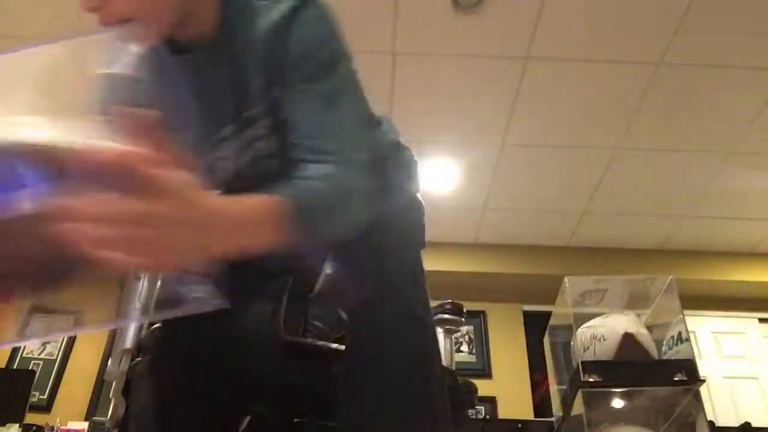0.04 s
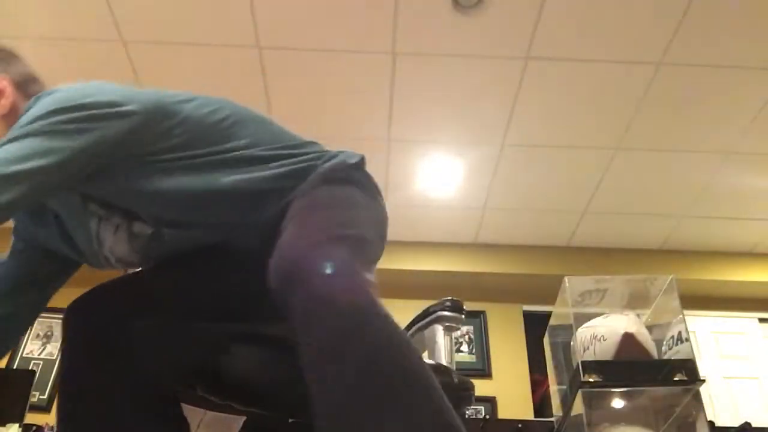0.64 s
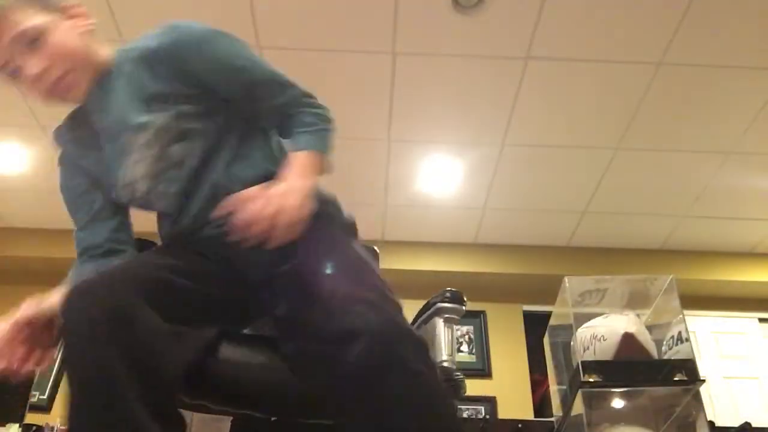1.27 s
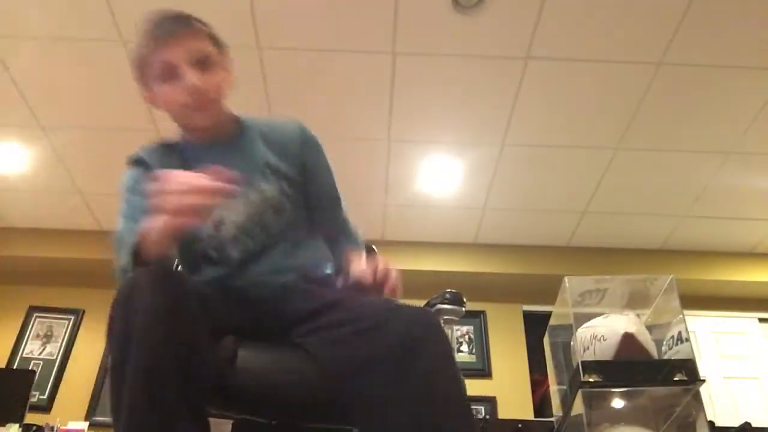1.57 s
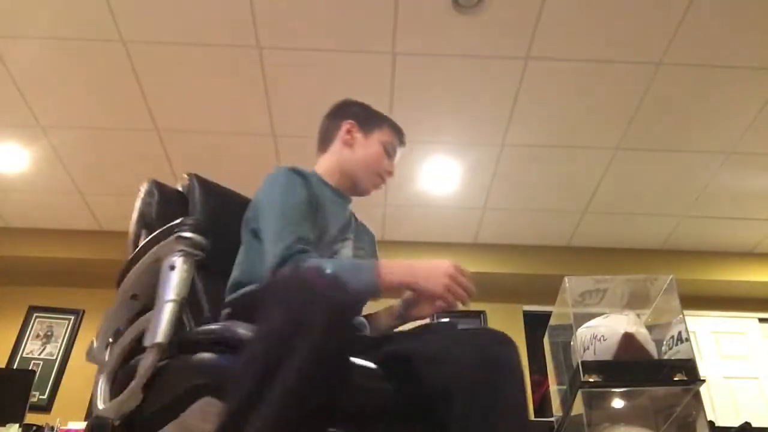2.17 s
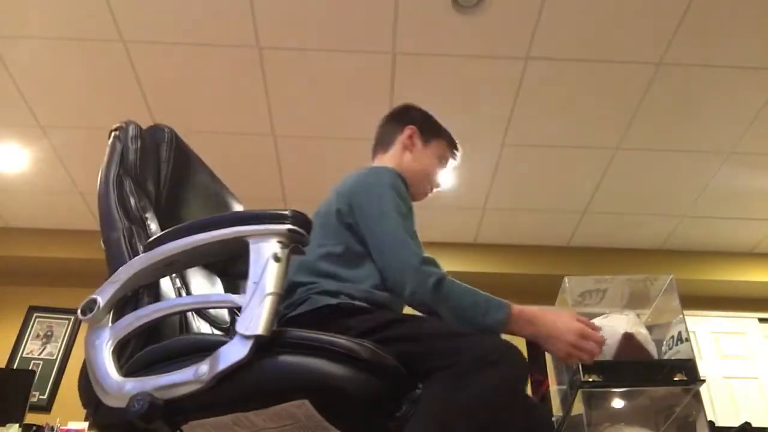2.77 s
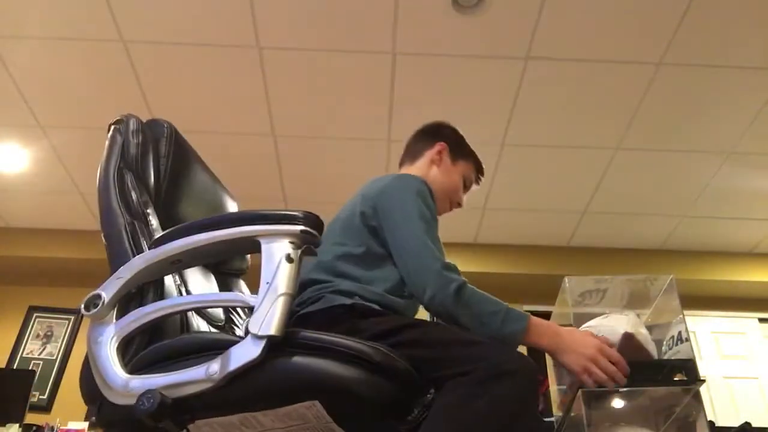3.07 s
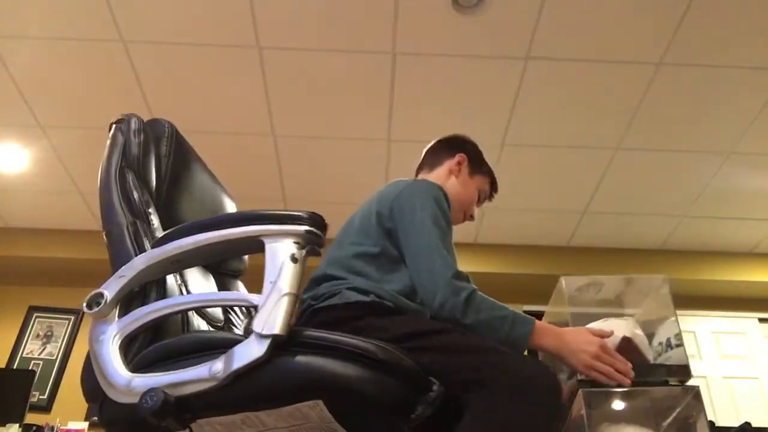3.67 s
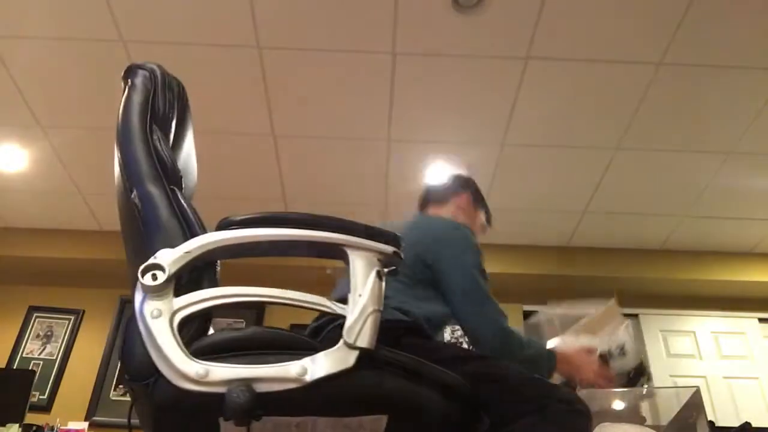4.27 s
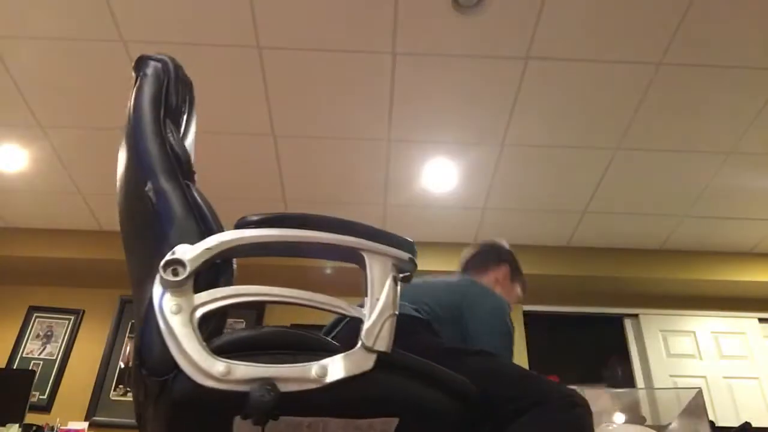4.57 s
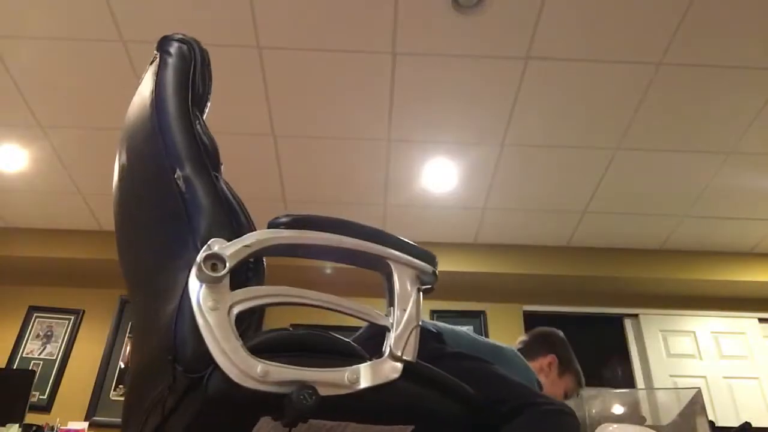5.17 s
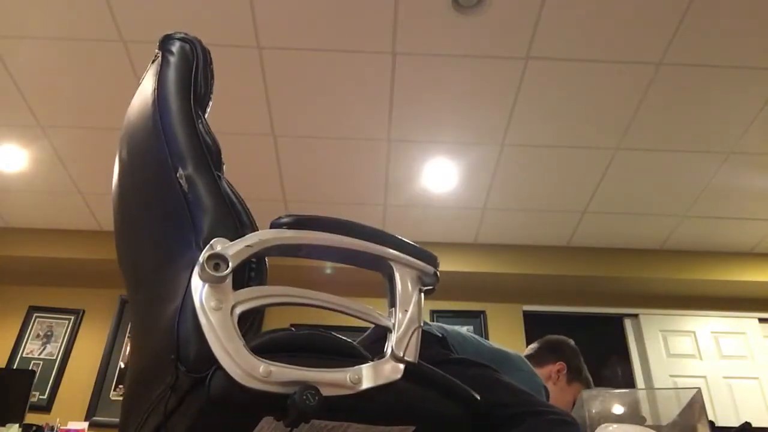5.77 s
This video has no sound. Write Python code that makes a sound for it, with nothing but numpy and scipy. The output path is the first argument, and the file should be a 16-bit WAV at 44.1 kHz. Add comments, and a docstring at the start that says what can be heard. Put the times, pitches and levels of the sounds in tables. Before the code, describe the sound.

A plastic display case clatters down with a squeak, an office chair knocks, clothes rustle, then another case creaks and thumps down.

```python
"""In a quiet room a clear acrylic display case is put down close by; it squeaks by stick-slip friction
and clatters to rest. An office chair then swivels with dull knocks, and clothes swish as they rub.
A second case is gripped, creaks, is lifted with a rattle and lands with a thump that sets the floor
booming. Last, it is nudged a few times. Every contact is a pulse coloured by the resonances of the
thing struck, followed by a short scatter of reflections."""
import sys
import numpy as np
from scipy import signal
from scipy.fft import rfft, irfft
from scipy.io import wavfile
from scipy.ndimage import uniform_filter1d

SR = 44100
rng = np.random.default_rng(int(sys.argv[2]) if len(sys.argv) > 2 else 0)


def put_to_file(sound):
    """Save the sound as 16-bit audio at rate SR, in the file named by the first command-line argument."""
    columns = np.atleast_2d(sound).T  # one column per channel
    safe = np.clip(columns, -1, 1)
    whole_steps = np.round(safe * 32767)
    wavfile.write(sys.argv[1], SR, whole_steps.astype(np.int16))


N = 261513
TAIL = SR * 2 // 5   # samples allowed for a decay

# The first case skidding on its edge. Each row: time in seconds, pitch in Hz, relative level in dB.
EDGE_SQUEAK = [(.590, 5550, -62), (.603, 5680, -44), (.609, 5990, -37), (.620, 5940, -33.5),
               (.626, 5250, -38), (.634, 5210, -39), (.640, 5930, -36), (.650, 5380, -51),
               (.695, 5120, -64)]


def first_case(level_db=-3.0):
    """Impacts excite the case's modes; its panels radiate in all directions, so much is heard by reflection."""
    # Each row: start in seconds, knock gain in dB, knock cutoff in Hz, clack gain in dB.
    hits = [(0.012, 8, 303, -30), (0.068, 7.5, 342, -22), (0.092, 14, 330, -20.5), (0.212, -1, 410, -18),
            (0.24, -2, 700, -14), (0.268, -3, 503, -17), (0.399, 0.5, 766, -8), (0.429, 9, 826, -24),
            (0.435, 6.5, 1010, -3.5), (0.443, 17.5, 470, -13), (0.486, 5, 800, -20), (0.555, 0.5, 706, -28),
            (0.725, 8, 850, -7), (0.742, 13.5, 970, -0.5), (0.755, 15.5, 850, -7),
            (0.768, 13.5, 765, -10.5), (0.798, 15.5, 520, -23), (0.839, 10.5, 600, -13.5),
            (0.884, 6, 680, -17)]
    # Each row: resonance in Hz, bandwidth in Hz, lift in dB.
    modes = [(181, 51, 3), (268, 6.6, 7.5), (443, 26, 10), (670, 27, 7), (780, 16, 2.5), (1035, 22, 8),
             (1244, 33, 9.5), (1906, 31, 7.5), (2800, 160, 3.5)]
    body = knocks(hits, bass_hz=227, bass_follow=-0.14, scatter_db=6, build_s=0.0016)
    panels = clacks(hits, [1000, 2800], [3400, 7800], tick_db=-17, scatter_db=10, build_s=0.0012)
    return from_db(level_db) * resonate(body + panels, modes)


def second_case(level_db=-1.5):
    """Bumps on the stand, then the rattle of the lifted case's loose cover, drive one set of modes."""
    # Each row: start in seconds, knock gain in dB, knock cutoff in Hz, clack gain in dB.
    bumps = [(3.397, 9.5, 310, -40), (3.462, 6, 496, -27.5), (3.515, 8, 500, -11.5),
             (3.537, 21.5, 433, -16), (3.548, 12.5, 373, -41), (3.618, 11, 670, -19), (3.659, 12, 590, -7),
             (3.814, 11, 560, -23), (3.885, 4.5, 300, -40), (4.013, -0.5, 460, -25.5),
             (4.13, -1.5, 241, -32)]
    rattle = [(4.262, 2, 640, -28), (4.272, 7, 467, -26), (4.287, 8, 262, -11), (4.295, 1, 312, -20),
              (4.312, 2.5, 236, -16), (4.329, -12, 404, -18)]
    # Each row: resonance in Hz, bandwidth in Hz, lift in dB.
    modes = [(356, 14, 2.8), (435, 7.8, 1.3), (670, 11, 2.8), (1070, 50, 2.7), (1410, 49, 4),
             (2870, 47, 5.9), (5770, 340, 4.3)]
    clack_hz, tick_hz = [1000, 2600], [3600, 7000]
    body = knocks(bumps, bass_hz=180, bass_follow=0.6, scatter_db=3.5, build_s=0.0013)
    panels = clacks(bumps, clack_hz, tick_hz, tick_db=-18.5, scatter_db=2.5, build_s=0.0014)
    base = knocks(rattle, bass_hz=78, bass_follow=0.15, scatter_db=-7.5, build_s=0.0014)
    cover = clacks(rattle, clack_hz, tick_hz, tick_db=-10, scatter_db=-7.5, build_s=0.0014, t60=0.025)
    return from_db(level_db) * resonate(body + panels + base + cover, modes)


def case_on_floor(level_db=-2.0):
    """Double impact: the case meets the floor with one edge, then drops onto the other."""
    # Each row: start in seconds, knock gain in dB, knock cutoff in Hz, clack gain in dB.
    hits = [(4.494, -2, 426, -48), (4.582, 12, 690, 1), (4.589, 20.5, 700, -3.5), (4.715, -0.5, 335, -47),
            (5.365, -1, 370, -34), (5.415, 8.5, 507, -24.5), (5.478, 8, 470, -31), (5.762, -12, 440, -52),
            (5.808, 9.5, 390, -42)]
    # Each row: resonance in Hz, bandwidth in Hz, lift in dB.
    modes = [(252, 20, 1.9), (321, 25, 3), (419, 23, 4.5), (585, 54, 4.4), (1080, 29, 2.6), (1290, 110, 8),
             (2500, 1300, 3.5)]
    drops = rebounds(hits, delay_s=0.017, gain_db=-1, limit_db=18, top_hz=310)
    first_edge = knocks(hits, bass_hz=124, bass_follow=0.1, scatter_db=3, build_s=0.00058)
    other_edge = knocks(drops, bass_hz=120, bass_follow=0.17, scatter_db=-8, build_s=0.00076)
    panels = clacks(hits, [900, 2800], [2700, 6200], tick_db=-12, scatter_db=5, build_s=0.0005)
    return from_db(level_db) * resonate(first_edge + other_edge + panels, modes)


def knocks(hits, bass_hz, bass_follow, scatter_db, build_s, mid_knock_hz=500):
    """A force pulse is as bright as it is brief; its low edge follows its cutoff by a power law."""
    out, impulse = np.zeros(N), signal.unit_impulse(TAIL // 8)
    for (s, db, top_hz, _), tail in zip(hits, scatter(len(hits), build_s)):
        low_hz = bass_hz * (top_hz / mid_knock_hz) ** bass_follow
        thinned = butterworth(impulse, low_hz, "high", order=2)
        push = -from_db(db) * butterworth(thinned, top_hz, "low", order=4)
        add(out, s, through_room(push, tail, scatter_db))
    return out


def rebounds(hits, delay_s, gain_db, limit_db, top_hz):
    """Rocking back gives each contact a dull second one, no harder than the weight allows."""
    return [(s + delay_s, min(db + gain_db, limit_db), top_hz, clack_db) for s, db, _, clack_db in hits]


def clacks(hits, clack_hz, tick_hz, tick_db, scatter_db, build_s, t60=0.014):
    """Flexural vibration: the panels clack at each contact, and the edges tick in proportion."""
    out = np.zeros(N)
    for (s, _, _, db), tail in zip(hits, scatter(len(hits), build_s)):
        crack = from_db(db) * (mode_burst(clack_hz, t60) + from_db(tick_db) * tick(tick_hz))
        add(out, s, through_room(crack, tail, scatter_db))
    return out


def resonate(x, modes):
    """Resonance: each mode lifts a narrow band and rings on, the longer the narrower it is."""
    for hz, width_hz, lift_db in modes:
        radius = np.exp(-np.pi * width_hz / SR)
        feedback = [1, -2 * radius * np.cos(2 * np.pi * hz / SR), radius ** 2]
        ringing = signal.lfilter([1, 0, -1], feedback, x + 1e-18) * (1 - radius ** 2) / 2
        x = x + (from_db(lift_db) - 1) * ringing
    return x


def edge_clicks(scatter_db=8):
    """Hard contact excites high frequencies: a bare edge catches with a bright click."""
    # Each row: start in seconds, gain in dB.
    clicks = [(0.24, -23.5), (0.268, -24.5), (0.399, -10.5), (0.486, -29), (0.742, -12), (3.515, -28.5),
              (3.535, -31), (3.618, -28.5)]
    out = np.zeros(N)
    for (s, db), tail in zip(clicks, scatter(len(clicks))):
        add(out, s, from_db(db) * through_room(tick(band_hz=[3400, 7800]), tail, scatter_db))
    return out


def tick(band_hz, t60=0.014, sheen_db=-19.0):
    """Heavily damped high modes make an edge tick, with a faint sheen above."""
    return mode_burst(band_hz, t60) + from_db(sheen_db) * mode_burst([7000, 13000], t60)


def mode_burst(band_hz, t60):
    """Modal overlap: a panel's crowded high modes merge into a fast-decaying band of noise."""
    t = np.arange(TAIL // 8) / SR
    burst = rng.standard_normal(len(t)) * from_db(-60 * t / t60)
    return butterworth(rms_one(burst) / np.sqrt(len(t)), band_hz, "band", order=2)


def floor_thump(push_hz=400):
    """Free vibration: the weight of the landing case sets the floor's low modes booming."""
    # Each row: start in seconds, gain in dB.
    landing = [(4.588, -21.5)]
    # Each row: frequency in Hz, relative level in dB, seconds to decay by 60 dB.
    modes = [(96, -41, 0.12), (128.6, -12.5, 0.29), (177.6, 2.5, 0.19), (227, -7, 0.21)]
    out, t = np.zeros(N), np.arange(TAIL) / SR
    boom = sum(from_db(db - 60 * t / t60) * np.sin(2 * np.pi * hz * t) for hz, db, t60 in modes)
    for s, db in landing:
        add(out, s, -from_db(db) * boom)
    return butterworth(out, push_hz, "low", order=2)


def first_case_squeaks():
    """Stick-slip friction: the first case judders as it touches down, then skids on its edge."""
    # Each row: time in seconds, pitch in Hz, relative level in dB.
    touchdown = [(0.426, 1300, -46), (0.438, 1273, -38), (0.46, 1258, -41), (0.475, 1280, -50),
                 (0.53, 1268, -54)]
    whistle = [(.622, 15600, -60), (.632, 15300, -58), (.652, 14200, -67), (.668, 12900, -62),
               (.675, 12800, -70)]
    # Each row: harmonic number, gain in dB.
    edge_harmonics = [(1, 3), (2, -20)]
    return (squeak(EDGE_SQUEAK, edge_harmonics, jitter=0.0177, flutter_db=3, room_db=-2)
            + skid_rasp()
            + squeak(whistle, [(1, 1.5)], jitter=0.03, flutter_db=4, room_db=0)
            + squeak(touchdown, [(1, 0)], jitter=0.037, flutter_db=4, room_db=-8))


def second_case_squeaks():
    """Stick-slip friction: the second case groans on its base, then creaks and squeaks in the hands."""
    # Each row: time in seconds, pitch in Hz, relative level in dB.
    base_groan = [(3.617, 299.2, -52), (3.627, 273, -35), (3.642, 272, -37.5), (3.66, 255.4, -41),
                  (3.69, 246, -55), (3.74, 234, -63)]
    grip_creak = [(3.657, 741, -48), (3.662, 705, -37), (3.672, 695, -37), (3.688, 664, -50),
                  (3.700, 675, -64)]
    grip_squeak = [(3.755, 1213, -57), (3.765, 1170, -46.5), (3.778, 1115, -50), (3.792, 1126, -57),
                   (3.805, 1088, -61), (3.816, 964, -40), (3.832, 1027, -54), (3.856, 986, -61),
                   (3.885, 954, -59)]
    lift_creak = [(4.261, 1159, -43.5), (4.272, 1067, -62), (4.284, 950, -46), (4.295, 1046, -57),
                  (4.315, 1143, -62), (4.331, 1224, -51.5), (4.345, 1260, -74)]
    # Each row: harmonic number, gain in dB.
    creak_harmonics = [(1, -1), (2, -9.5), (3, -16.5), (4, -24)]
    squeak_harmonics = [(1, 5), (2, -19), (3, -19.5), (4, -25), (5, -19.5), (6, -21), (7, -33), (8, -33.5)]
    return (squeak(base_groan, [(1, 9), (2, -23)], jitter=0.028, flutter_db=5.5, room_db=-4.5)
            + squeak(grip_creak, creak_harmonics, jitter=0.0255, flutter_db=4, room_db=-1)
            + squeak(grip_squeak, squeak_harmonics, jitter=0.0278, flutter_db=4.5, room_db=-3.5)
            + squeak(lift_creak, [(1, 4), (2, -11)], jitter=0.085, flutter_db=5, room_db=-7))


def squeak(curve, harmonics, jitter, flutter_db, room_db):
    """Stick-slip oscillation: a gliding tone whose pitch and strength shake, smeared by the room."""
    hz, db = in_time(curve)
    phase = 2 * np.pi * np.cumsum(hz * (1 + jitter * drift(600))) / SR
    slipping = uniform_filter1d(during(curve), size=128)
    wave = sum(from_db(level) * np.sin(round(k) * phase) for k, level in harmonics)
    tone = slipping * from_db(db) * wave
    shaken = tone * from_db(flutter_db * drift(300))
    reflected = from_db(room_db) * signal.fftconvolve(shaken, scatter(count=1)[0])[:N]
    return rms_one(shaken + reflected) * np.std(tone)   # the slip's energy is spread, not increased


def skid_rasp(rasp_db=-11, flutter_db=4):
    """Friction noise: the skidding edge grates, its level following the squeak."""
    _, db = in_time(EDGE_SQUEAK)
    # Each row: frequency in Hz, relative spectral density in dB.
    spectrum = [(1000, -42), (4500, -13), (6000, 7.5), (8000, 2), (9500, -5), (12000, -12), (15500, -22)]
    envelope = during(EDGE_SQUEAK) * from_db(db + rasp_db + flutter_db * drift(202))
    return envelope * coloured_noise(spectrum)


def nudges(grain_db=1.0, attack_s=0.0056, fall_db_per_s=246):
    """Sliding friction: pushed along the floor, the case scrapes at once and slows to rest."""
    # Each row: start in seconds, level in dB.
    pushes = [(5.415, -68.5), (5.478, -59), (5.808, -61.5)]
    # Each row: frequency in Hz, relative spectral density in dB.
    spectrum = [(600, -19), (1900, -12), (2700, 1), (3200, 1), (4200, -7), (5500, -14), (8000, -29),
                (15000, -46)]
    envelope, t = np.zeros(N), np.arange(TAIL) / SR
    for s, db in pushes:
        add(envelope, s, np.minimum(t / attack_s, 1) * from_db(db - fall_db_per_s * t))
    return envelope * from_db(grain_db * drift(410)) * coloured_noise(spectrum)


def chair(level_db=-0.5):
    """Impacts in the swivel excite the chair's modes, and the seat answers with a low rebound."""
    # Each row: start in seconds, knock gain in dB, knock cutoff in Hz, clack gain in dB.
    hits = [(1.588, -12.5, 335, -28), (1.628, -16, 270, -26), (1.658, 10.5, 560, -9), (1.79, -8, 454, -37),
            (1.873, -10, 483, -21), (1.918, -13.5, 507, -32), (2.043, 7, 535, -15.5),
            (2.192, -1.5, 543, -39), (2.369, -6, 322, -28), (2.402, -0.5, 185, -38),
            (2.475, -0.5, 554, -23), (2.75, -12.5, 240, -46), (3.2, -5.5, 237, -40), (3.257, 8, 518, -14)]
    # Each row: resonance in Hz, bandwidth in Hz, lift in dB.
    modes = [(120, 34, 5.5), (282, 53, 6.4), (590, 110, 5.5), (1010, 42, 8.5), (1170, 78, 7.7)]
    rocking = rebounds(hits, delay_s=0.0222, gain_db=0, limit_db=6, top_hz=207)
    swivel = knocks(hits, bass_hz=126, bass_follow=0.76, scatter_db=-2, build_s=0.00083)
    seat = knocks(rocking, bass_hz=130, bass_follow=0.63, scatter_db=-3, build_s=0.00083)
    shell = clacks(hits, [900, 1600], [3000, 7500], tick_db=-24, scatter_db=2.5, build_s=0.00083)
    return from_db(level_db) * resonate(swivel + seat + shell, modes)


def clothes(grain_db=1.53, fidget_db=-72.5, swish_in_rustle_db=-12.5):
    """Friction of fibres makes grainy noise: bright as a sleeve brushes, dull in a slide on the seat."""
    # Each row: midpoint in seconds, length in seconds, level in dB.
    body_moves = [(0.13, .26, -59), (0.28, 0.11, -60), (0.42, 0.15, -55.5), (0.56, 0.03, -52.5),
                  (0.64, 0.17, -64.5), (0.79, 0.059, -63), (0.9, 0.26, -69), (1.37, 0.27, -65.5),
                  (1.54, 0.15, -59.5), (1.75, 0.24, -60), (2.41, 0.081, -68), (2.68, 0.34, -71.5),
                  (3.73, 0.19, -63), (4.03, .14, -67), (4.42, 0.65, -68.5), (4.86, 0.26, -69)]
    swipes = [(0.13, 0.23, -68.5), (0.35, .04, -66), (0.51, 0.056, -62.5), (0.558, 0.041, -53.5),
              (0.65, 0.15, -64), (0.845, .04, -64.5), (1.74, 0.091, -58.5)]
    seat_slides = [(3.145, 0.18, -60.5)]
    # Each row: frequency in Hz, relative spectral density in dB.
    rustle_spectrum = [(60, -2), (200, 9), (450, 6), (900, 3), (2000, -0.5), (3500, -5.5), (6500, -7),
                       (9000, -47), (16000, -30)]
    swish_spectrum = [(60, -45), (1500, -16), (3500, -4.5), (5500, 5.5), (8500, 1.5), (10500, -4.5),
                      (13000, -4.5), (16000, -13)]
    slide_spectrum = [(200, -4.5), (700, -4.5), (1050, -11), (1500, -17.5), (3000, -28), (9000, -44)]
    rustle = np.hypot(swells(body_moves), from_db(fidget_db))
    swish = np.hypot(swells(swipes), from_db(swish_in_rustle_db) * rustle)
    layers = [(rustle, rustle_spectrum), (swish, swish_spectrum), (swells(seat_slides), slide_spectrum)]
    grain = from_db(grain_db * drift(250))
    return grain * sum(gain * coloured_noise(spectrum) for gain, spectrum in layers)


def swells(moves):
    """Incoherent addition: each move rises and falls in a bell curve, and overlaps add in power."""
    t = np.arange(N) / SR
    power = sum(from_db(db) ** 2 * np.exp(-(2 * (t - s) / length) ** 2) for s, length, db in moves)
    return np.sqrt(power)


def through_room(sound, tail, scatter_db):
    """Superposition of the direct path and its reflections, with a power gain near 1."""
    response = signal.unit_impulse(TAIL) + from_db(scatter_db) * tail
    return signal.fftconvolve(sound, response / np.hypot(1, from_db(scatter_db)))


def scatter(count, build_s=0.00053, early_s=0.027, early_db=3):
    """Reverberation, one tail per place: strong early reflections, then a decay with the lows last."""
    # Each row: frequency in Hz, reverberation time in seconds.
    room_t60 = [(100, 0.51), (250, 0.32), (700, 0.19), (2000, 0.27), (9000, 0.19)]
    edges_hz = 31.25 * 2 ** np.arange(0, 9.1, 0.5)   # half octaves
    t, tails = np.arange(TAIL) / SR, 0
    swell = (1 - np.exp(-t / build_s)) * (1 + from_db(early_db) * np.exp(-(t / early_s) ** 2))
    white = rng.standard_normal((2, count, TAIL))
    for k, (low, high) in enumerate(zip(edges_hz, edges_hz[1:])):
        band = rms_one(butterworth(white[k % 2], [low, high], "band", order=2))
        dying = band * swell * from_db(-60 * t / at_hz(room_t60, np.sqrt(low * high)))
        energy_share = 2 * (high - low) / SR
        tails = tails + rms_one(dying) * np.sqrt(energy_share / TAIL)
    return tails


def room_tone(air_db=-66):
    """The noise floor: faint broadband air noise and the steady tones of mains hum."""
    # Each row: frequency in Hz, relative spectral density in dB.
    air_spectrum = [(18, -48), (30, -26), (51, 0), (69, 1.5), (140, -19), (230, -7.5), (307, -17.5),
                    (546, -21.5), (591, -17.5), (787, -35), (996, -26), (1640, -33), (3070, -30),
                    (6050, -41), (15500, -45.5)]
    # Each row: frequency in Hz, rms level in dB.
    mains = [(60, -85), (120, -78.5)]
    t = np.arange(N) / SR
    hum = sum(np.sqrt(2) * from_db(db) * np.sin(2 * np.pi * hz * t) for hz, db in mains)
    return from_db(air_db) * coloured_noise(air_spectrum) + hum


def from_db(db):
    """Decibels to amplitude ratio."""
    return 10 ** (np.asarray(db) / 20)


def rms_one(x):
    """Normalisation of each row to rms 1."""
    return x / np.sqrt(np.mean(x ** 2, axis=-1, keepdims=True) + 1e-20)


def in_time(curve):
    """Linear interpolation of a curve's columns at every sample."""
    s, *columns = np.transpose(curve)
    return [np.interp(np.arange(N) / SR, s, column) for column in columns]


def during(curve):
    """A rectangular window over a curve's time span."""
    t = np.arange(N) / SR
    return 1.0 * ((t > curve[0][0]) & (t < curve[-1][0]))


def at_hz(points, hz):
    """Interpolation on a log-frequency axis."""
    known_hz, values = np.transpose(points)
    return np.interp(np.log(hz), np.log(known_hz), values)


def butterworth(x, hz, kind, order):
    """Causal filtering with a maximally flat passband."""
    sections = signal.butter(order, np.clip(hz, 10, 0.45 * SR), kind, fs=SR, output="sos")
    return signal.sosfilt(sections, x + 1e-18)


def drift(rate):
    """Random modulation with a spread near 1, through `rate` knots a second."""
    knots = rng.standard_normal(N // 8)
    return np.interp(np.arange(N) * rate / SR, np.arange(len(knots)), knots)


def coloured_noise(spectrum):
    """Spectral shaping of white noise, to rms 1."""
    hz = np.arange(N // 2 + 1) * SR / N + 1
    return rms_one(irfft(rfft(rng.standard_normal(N)) * from_db(at_hz(spectrum, hz)), N))


def add(track, s, sound):
    """Superposition of a sound on a track, from `s` seconds."""
    start = max(0, round(s * SR))
    track[start:start + len(sound)] += sound[:N - start]


def scene():
    """Sound pressures add: both cases, the chair and the clothes over the quiet room."""
    impacts = first_case() + second_case() + case_on_floor() + edge_clicks() + floor_thump()
    friction = first_case_squeaks() + second_case_squeaks() + nudges()
    return (impacts + friction + chair() + clothes() + room_tone())[None]


def record(dry):
    """Band limiting: the microphone loses the deepest bass, and the top is cut steeply."""
    low_hz, top_hz = 48, 15700
    thin = butterworth(dry, low_hz, "high", order=4)
    return signal.sosfilt(signal.ellip(10, 0.1, 70, top_hz, fs=SR, output="sos"), thin)


dry = scene()
out = record(dry)
put_to_file(out)
```